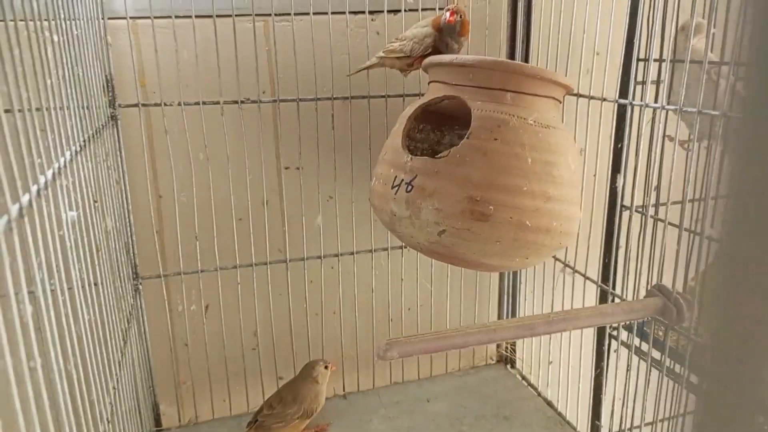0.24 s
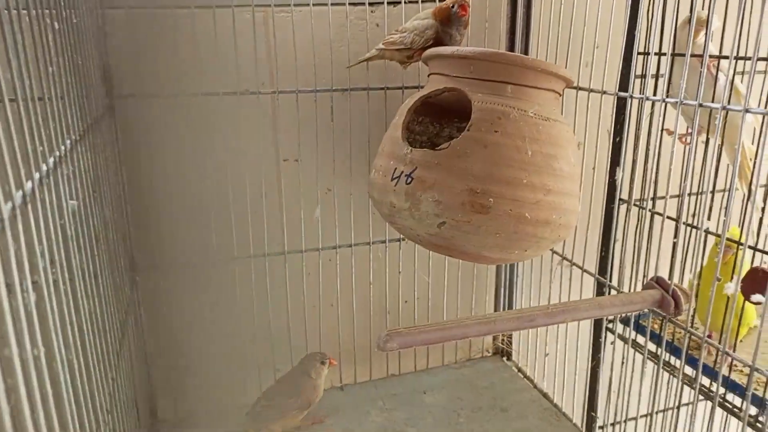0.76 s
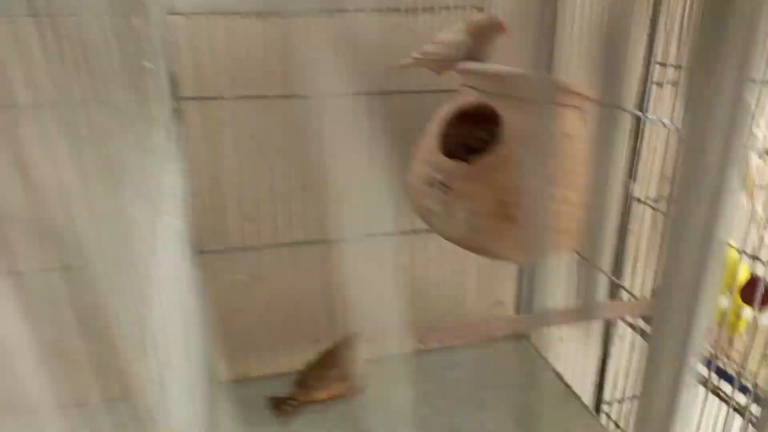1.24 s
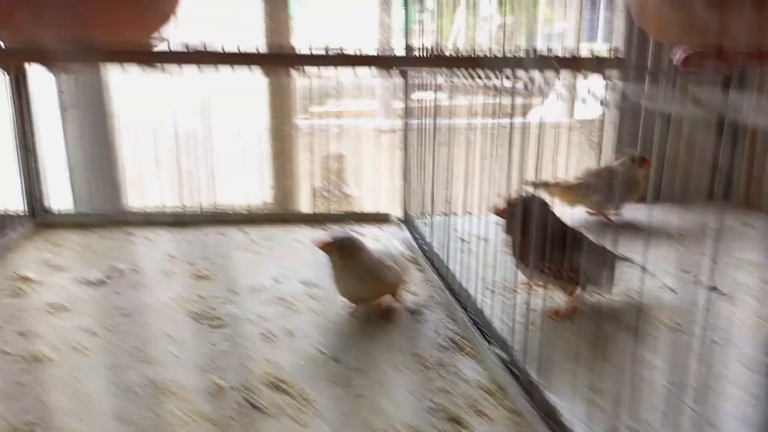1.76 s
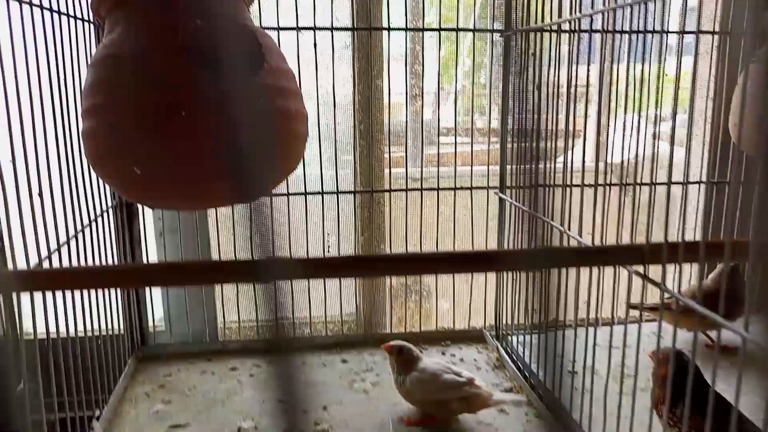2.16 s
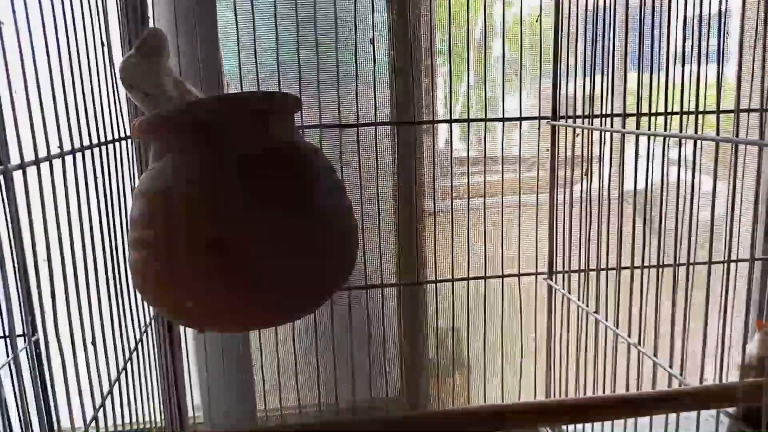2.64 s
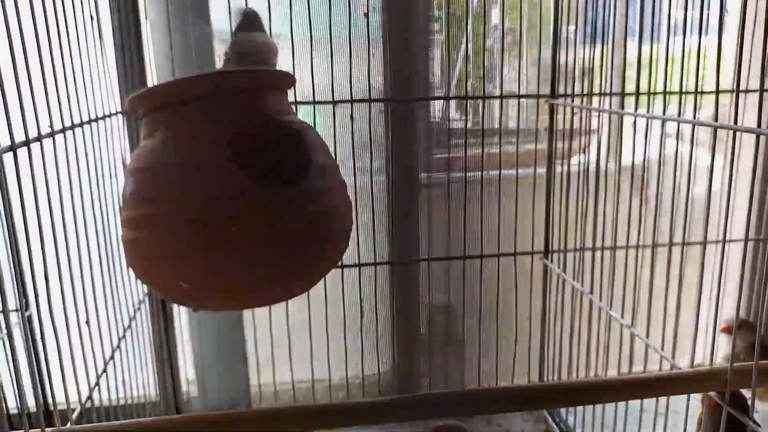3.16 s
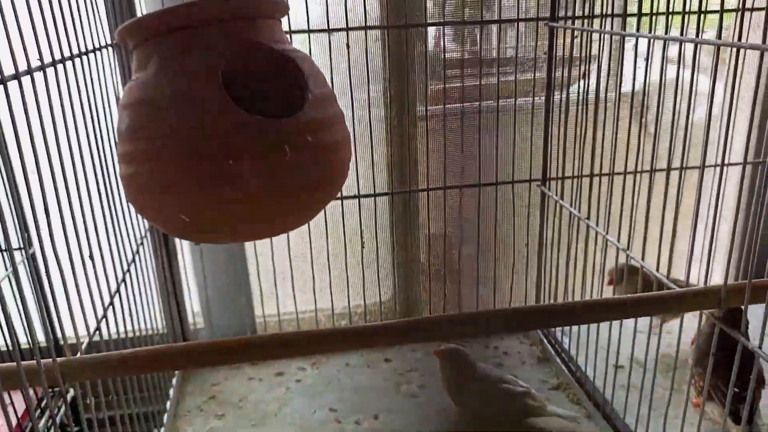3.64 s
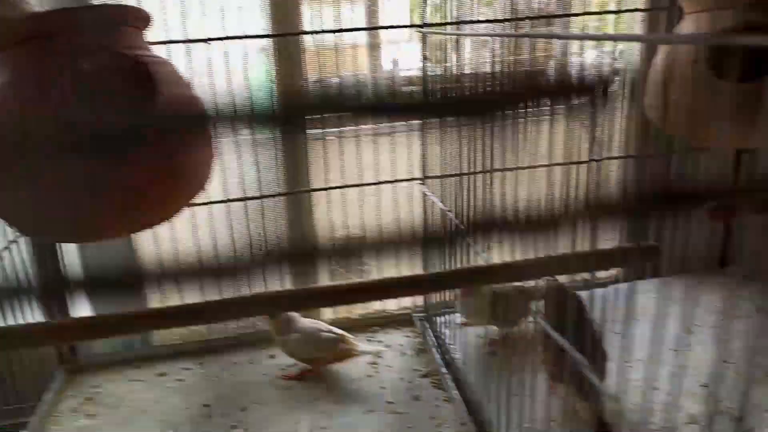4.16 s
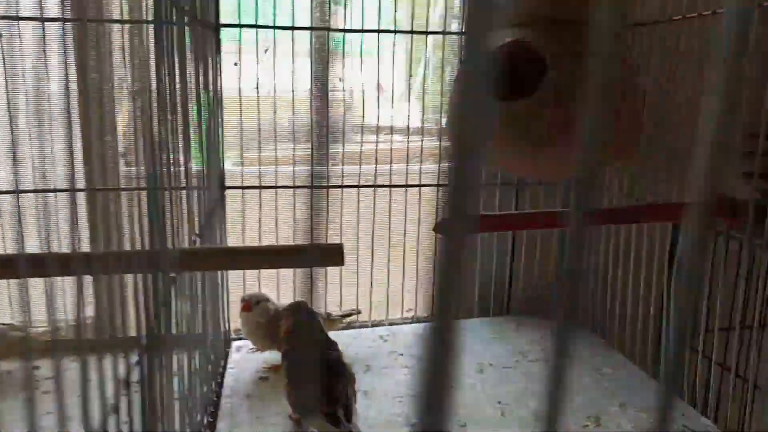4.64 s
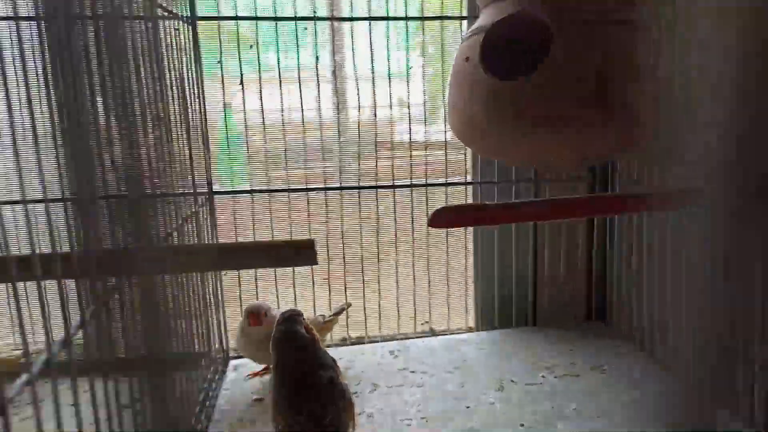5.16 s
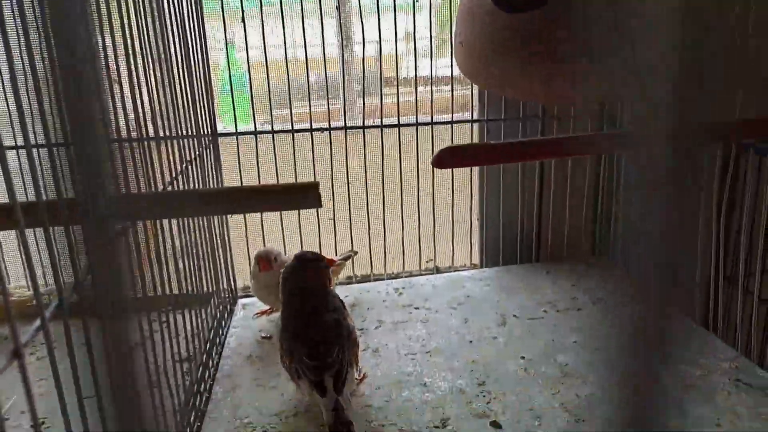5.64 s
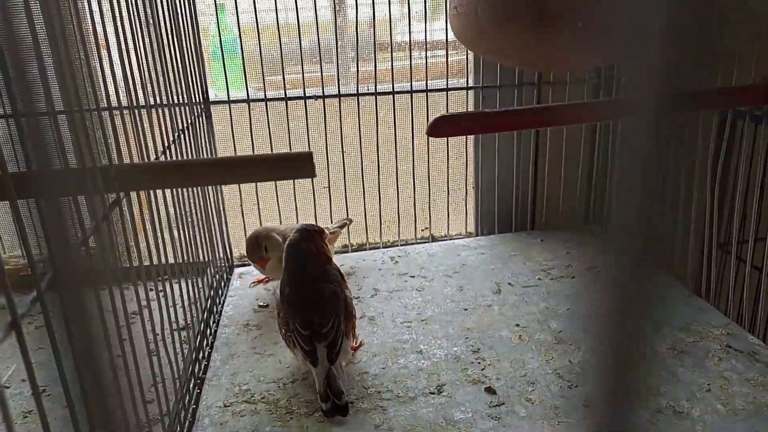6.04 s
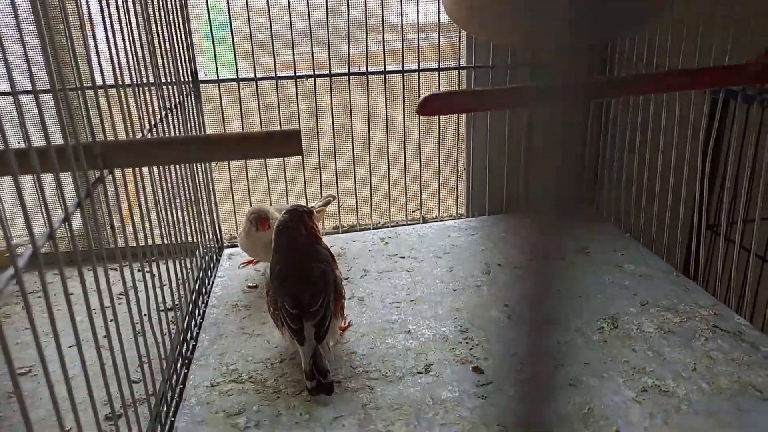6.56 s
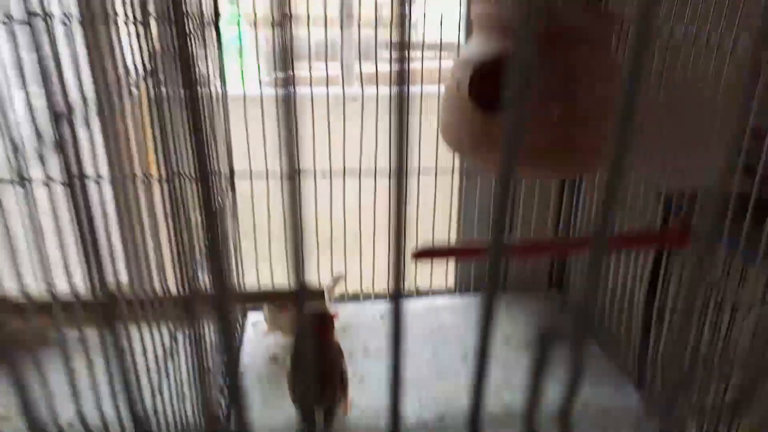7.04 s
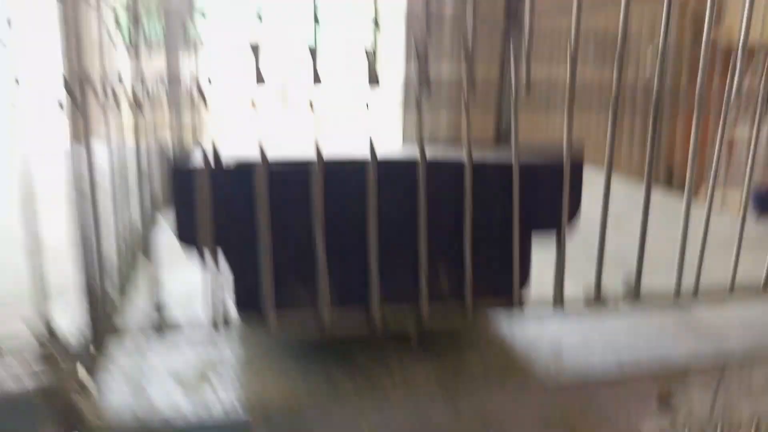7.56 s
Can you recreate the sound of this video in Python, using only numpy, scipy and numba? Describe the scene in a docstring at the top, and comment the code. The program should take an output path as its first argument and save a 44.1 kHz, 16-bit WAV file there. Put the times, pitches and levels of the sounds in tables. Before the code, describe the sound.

Close to the cages, finches open with hissy chips, two then a rapid cluster. After sparser calls and a quick knock, raspy chatter builds with short nasal notes and two strong chips, over other birds murmuring farther off. A soft low motor hum swells briefly as the microphone moves. The calls thin to quiet beeps, then a second run of rasps and a few nasal notes ends it in the small reverberant room.

```python
"""Two short sharp chips come first, then small finches give harsh rasps, nasal notes and more chips in a bare
aviary. Rasps are pulse trains and breath noise through moving resonances; notes and chips are overtone stacks
around a resonance, chips with a burst of hiss. A far flock murmurs, and knocks ring the cage modes. Feedback
delays make the hard room. A mains motor hums as a harmonic series; rumble, air and treble hiss are shaped noise."""
import sys
import numpy as np
from scipy import signal
from scipy.fft import rfft, irfft, next_fast_len
from scipy.io import wavfile
from scipy.ndimage import uniform_filter1d, minimum_filter1d
from numba import njit

SR = 44100
rng = np.random.default_rng(int(sys.argv[2]) if len(sys.argv) > 2 else 0)


def file_out(sig):
    """Save sig as 16-bit WAV at sys.argv[1]."""
    # one column per channel
    cols = np.atleast_2d(sig).T
    # limit, then scale
    lim = np.clip(cols, -1, 1)
    pcm = np.round(lim * 32767).astype(np.int16)
    wavfile.write(sys.argv[1], SR, pcm)


N = 343980

# the hum swells and fades as the microphone moves: (time [s], level [dB])
HUM_LEVEL = [(0, -68.5), (2.5, -65.5), (2.62, -50.5), (3.3, -58.5), (4.1, -70), (4.55, -43), (5.3, -53.5),
             (6.5, -57.5), (7.2, -61.5), (7.4, -61), (7.8, -65.5)]


def from_db(db):
    """Level to amplitude ratio: 20 dB for a factor of ten."""
    return 10 ** (np.asarray(db) / 20)


def rms_one(x):
    """Normalisation to unit effective value."""
    return x / np.sqrt(np.mean(x ** 2) + 1e-20)


def in_time(rows):
    """Linear interpolation of each column after the first, sample by sample."""
    s, *columns = np.transpose(rows)
    return [np.interp(np.arange(N) / SR, s, c) for c in columns]


def drift(rate_hz, count=N):
    """Slow random modulation: white noise through a double one-pole low-pass, run in; rms 1."""
    r = np.exp(-2 * np.pi * rate_hz / SR)
    noise = rng.standard_normal(count + 8000)
    return rms_one(signal.lfilter([1], [1, -2 * r, r * r], noise)[8000:])


def band(x, low_hz, high_hz):
    """Band-pass filtering with a maximally flat (Butterworth) response."""
    return signal.sosfilt(signal.butter(2, [low_hz, high_hz], "band", fs=SR, output="sos"), x)


def mains_hum():
    """Harmonic series of a mains motor: each partial wavers in level and phase."""
    # partials: (frequency [Hz], level against the hum level [dB])
    partials = [(60, -27), (120, 0), (180, -1.5), (240, -7), (300, -15.5), (360, -17), (420, -20.5)]
    t = np.arange(N) / SR
    hum = 0
    for hz, db in partials:
        wavering_phase = 2 * np.pi * hz * t + .5 * drift(5.1)
        hum = hum + from_db(db + 3.4 * drift(3.4)) * np.sin(wavering_phase)
    return from_db(in_time(HUM_LEVEL)[0]) * hum


def whine():
    """Pure tone with phase jitter: a 360 Hz overtone that stands out early, then stops."""
    # (time [s], amplitude level [dB])
    whine_level = [(0.0, -59.5), (1.68, -61.5), (2.3, -72)]
    t = np.arange(N) / SR
    sounding = t < whine_level[-1][0]
    tone = np.sin(2 * np.pi * 360 * t + .5 * drift(2.1))
    return from_db(in_time(whine_level)[0]) * sounding * tone


def rumble():
    """Band-limited noise whose level follows part of the hum's swing and bulges once."""
    base_db, follows = -61, 0.31   # level at a hum of -57.5 dB, outside the bulge; share of the hum's swing
    swell_s, swell_width_s, swell_db = 4.857, 0.17, 10.5
    t = np.arange(N) / SR
    swell = swell_db * np.exp(-((t - swell_s) / swell_width_s) ** 2)
    level_db = base_db + follows * (in_time(HUM_LEVEL)[0] + 57.5) + swell
    return from_db(level_db + 4.9 * drift(11)) * rms_one(band(rng.standard_normal(N), 62, 514))


def treble_hiss():
    """High band-limited noise under an amplitude envelope: the hiss comes and goes."""
    # (time [s], level [dB])
    treble_level = [(0, -43.5), (.7, -56), (2.2, -53), (2.55, -85.5), (4.55, -81), (4.95, -44.5),
                    (5.15, -54), (5.3, -82.5), (7.8, -87.5)]
    noise = band(band(rng.standard_normal(N), 5600, 8900), 4000, 12500)
    return from_db(in_time(treble_level)[0]) * rms_one(noise)


def air_noise():
    """Spectral shaping: white noise weighted by the colour of the air noise, slowly drifting in level."""
    # (time [s], level [dB])
    air_level = [(0, -56.5), (1.5, -51.5), (3, -50), (5, -52.5), (7.2, -50), (7.8, -54.5)]
    # relative spectrum: (frequency [Hz], density [dB per Hz])
    air_spectrum = [(15, -53), (25, -26.5), (64, -30.5), (118, -12.5), (366, -34.5), (504, -9.5),
                    (1530, 2.5), (2760, -1), (3360, 6), (4980, -16), (9000, -24.5), (11700, -71),
                    (19800, -120)]
    hz, db = np.transpose(air_spectrum)
    bins_hz = np.fft.rfftfreq(N, 1 / SR)
    colour = from_db(np.interp(np.log(bins_hz + 1), np.log(hz), db))
    noise = rms_one(irfft(rfft(rng.standard_normal(N)) * colour, N))
    return from_db(in_time(air_level)[0] + 0.89 * drift(0.93)) * noise


def stack(hz, centre_hz, spread_hz, hoarse):
    """Additive synthesis: overtones of hz fade away from a centre; hoarseness shakes pitch and level."""
    count = len(hz)
    shaken_hz = hz + 130 * hoarse * hz / centre_hz * drift(133.4, count=count)
    phase = 2 * np.pi * np.cumsum(shaken_hz) / SR
    k = np.arange(1, int(10000 / hz.max()) + 1)[:, None]
    fall_db = -6.0 * np.abs((k * hz - centre_hz) / spread_hz) ** 1.407
    fall_db -= 4.2 * np.clip(10 * (k * hz / centre_hz - 1), 0, 1)   # weaker above the centre
    tones = np.sum(from_db(fall_db) * np.sin(k * phase + k ** 2), axis=0)   # k squared scatters the phases
    return np.sqrt(2) * tones * from_db(4.58 * hoarse * drift(110, count=count))


def far_flock():
    """Superposition of many sources: random nasal notes from other cages over a murmur of band noise."""
    # (time [s], level of notes and of murmur before its own wavering [dB])
    far_level = [(0, -49), (2.5, -40.5), (3.3, -40.5), (4.43, -27.5), (5.1, -44.5), (5.8, -48), (6.5, -34),
                 (7.4, -31), (7.8, -49)]
    notes_per_s = 22
    out = np.zeros(N + SR)
    for when, length, pitch, colour, loud in rng.random((int(notes_per_s * N / SR), 5)):
        size = int((0.04 + .12 * length) * SR)
        hz = (520 + 200 * pitch) * np.linspace(1.01, .99, size)
        note = stack(hz, 2700 + 2500 * colour, 480, hoarse=.45)
        out[int(when * N):][:size] += note * np.hanning(size) ** .5 * from_db(-12 * loud)
    blur = rms_one(band(band(rng.standard_normal(N), 2400, 4600), 2200, 5000))
    murmur = from_db(-2.5 + 1.5 * drift(6)) * blur
    return from_db(in_time(far_level)[0]) * (rms_one(out[:N]) + murmur)


def knocks():
    """Modal excitation: each blow is a short scuff of noise that rings the cage modes, over a dull thud."""
    # blows on the cage: (time [s], scuff drive [dB], thud drive against it [dB])
    blow_rows = [(2.481, -17.5, -38), (2.513, -16, -22), (2.522, -16.5, -22), (3.467, -37, -17),
                 (3.913, -21.5, -12), (3.931, -31, -9.5), (3.954, -50, -9)]
    # modes: (frequency [Hz], drive gain [dB], 60 dB decay time [s])
    cage_modes = [(375, -37, 0.047), (480, -26.5, 0.066), (630, -29.5, 0.046), (811, -28.5, 0.022),
                  (1256, -36.5, 0.051)]
    blows = np.zeros((2, N))
    for s, scuff_db, thud_db in blow_rows:
        blows[:, round(s * SR)] = from_db([scuff_db, scuff_db + thud_db])
    decays = signal.lfilter([1], [1, -.992], blows)
    scuff, thud = decays * rng.standard_normal((2, N)) + 1e-18
    out = from_db(11.5) * band(scuff, 404, 900) + from_db(32) * band(band(thud, 81, 270), 80, 510)
    for hz, gain_db, t60 in cage_modes:
        r, w = from_db(-60 / (t60 * SR)), 2 * np.pi * hz / SR
        mode = [0, np.sin(w)], [1, -2 * r * np.cos(w), r * r]
        out += from_db(gain_db) * signal.lfilter(*mode, band(scuff, 450, 1600))
    return out


def chips():
    """Transient with a resonance: a hoarse stack, strongest at the beak, and broad hiss, dying fast."""
    # (time [s], level before halving [dB], fundamental after the drop [Hz], beak resonance [Hz],
    #  starting hiss gain against the tone [dB])
    chip_rows = [(.002, -23.5, 2810, 5530, -4.5), (0.03, -26, 1646, 6600, -3),
                 (0.311, -13, 1314, 6300, -3.5), (.335, -6.5, 1720, 6220, -6.5),
                 (0.362, -24.5, 1273, 4460, 14.5), (.392, -7, 2467, 5200, -2), (.431, -9, 2430, 5060, -2),
                 (0.502, -5.5, 2725, 5470, -8), (0.534, -19, 2754, 5100, 5.5), (0.73, -21, 999, 4480, 2.5),
                 (1.085, -9, 873, 5250, -2.5), (1.098, -15, 868, 4880, 4), (1.266, -19.5, 1727, 5560, -9.5),
                 (1.446, -15.5, 2490, 5470, -16), (1.517, -20, 2404, 4820, -16),
                 (1.539, -23.5, 1327, 4370, -17), (1.563, -6, 2900, 6220, -22),
                 (1.626, -11.5, 861, 5340, -21), (2.359, -7, 3160, 6240, -25), (3.922, -5, 654, 6560, -13),
                 (4.02, 3, 608, 6440, -23.5), (6.391, -19.5, 655, 5700, -26),
                 (6.797, -9.5, 637, 5430, -15.5)]
    dip, dip_s = 0.0904, 0.0081   # pitch starts this share high and drops
    hold_s, t60_s = 0.013, .075   # full level, then the tone's 60 dB decay
    shake_db = .3   # fast pitch tremor, 20 log10 of the frequency ratio
    out, t = np.zeros(N + SR), np.arange(SR // 5) / SR
    shape = np.minimum(t / 0.005, 1) * from_db(-60 * np.maximum(t - hold_s, 0) / t60_s)
    for s, level_db, hz, beak_hz, hiss_db in chip_rows:
        pitch_hz = hz * (1 + dip * np.exp(-t / dip_s)) * from_db(shake_db * drift(250, count=len(t)))
        tone = stack(pitch_hz, beak_hz, 1076, hoarse=0.83)
        hiss = rms_one(band(band(rng.standard_normal(len(t)), 2800, 8400), 2700, 9800))
        hiss *= from_db(-40 * t / t60_s)   # the hiss dies before the tone
        out[round(s * SR):][:len(t)] += from_db(level_db) * (tone + from_db(hiss_db) * hiss) * shape / 2
    return out[:N]


def notes():
    """Formant principle: gliding harmonics around a mouth resonance; clear notes carry more overtones."""
    # (start [s], loudest [s], end [s], level at the loudest [dB], overtone nearest the mouth resonance at
    #  full effort, first [Hz] and last [Hz], its number, hoarseness [0-1]);
    # a fraction in the number sets the resonance between two overtones
    note_rows = [ (0.356, 0.421, .5, -19.5, 3580, 3405, 0.98, .7),
                 (0.497, 0.57, .7, -19.5, 3380, 3122, 1, 0.5),
                 (0.437, 0.453, .64, -21.5, 2643, 2846, 4, 0.7),
                 (1.087, 1.103, 1.38, -42.5, 1535, 1514, 1, 0.71),
                 (1.442, 1.446, 1.67, -37, 2424, 2615, 1, 0.91),
                 (1.963, 2, 2.08, -36.5, 3310, 3310, 6, 0.25),
                 (2.048, 2.162, 2.22, -45, 1350, 1345, 2, 0.8),
                 (2.21, 2.235, 2.255, -9.5, 3125, 3173, 1, 0.34),
                 (2.261, 2.286, 2.43, -19.5, 2598, 2860, 3, 0.65),
                 (2.309, 2.333, 2.37, -18.5, 3250, 3450, 1, .8),
                 (2.384, 2.406, 2.5, -16, 3350, 3307, 1, 0.58),
                 (2.799, 2.816, 2.95, -36, 2790, 2646, 5, 0.26),
                 (3.28, 3.305, 3.33, -37, 4440, 4460, 8, .25),
                 (3.345, 3.372, 3.39, -41.5, 1820, 1810, 3, 0.24),
                 (3.657, 3.73, 3.82, -20.5, 3640, 3680, 6, 0.71),
                 (3.836, 3.933, 3.93, -17, 3685, 3670, 6, 0.65),
                 (3.99, 3.998, 4.06, -41, 2280, 2290, 1, .3), (4.18, 4.256, 4.28, -19, 3037, 3036, 1, 0.73),
                 (4.455, 4.541, 4.66, -15, 3785, 3186, 6, 0.77),
                 (4.702, 4.754, 4.83, -17, 5450, 5700, 5, 0.61),
                 (4.749, 4.79, 4.94, -33, 2067, 1820, 3, 0.94),
                 (5.014, 5.046, 5.3, -44, 1523, 1535, 2, .83),
                 (5.36, 5.396, 5.64, -32, 5400, 5340, 7.68, 0.32),
                 (5.432, 5.468, 5.65, -20, 3830, 3820, 5.45, 0.63),
                 (5.963, 5.971, 6.06, -40.5, 2280, 2340, 2, 0.55),
                 (6.112, 6.228, 6.45, -24, 4676, 4494, 4.02, 0.13),
                 (6.207, 6.25, 6.37, -29.5, 3530, 3400, 6, 0.28),
                 (7.267, 7.294, 7.335, -10, 4018, 4104, 5.17, 0.35),
                 (7.325, 7.337, 7.44, -25.5, 5630, 4870, 4, .7),
                 (7.423, 7.457, 7.49, -24, 4360, 4270, 8, 0.18),
                 (7.487, 7.557, 7.7, -13, 3056, 3440, 5, 0.78),
                 (7.476, 7.619, 7.7, -16.5, 3876, 3863, 6, 0.78), ]
    rise_db, fall_db = 8, 12.5   # below the loudest at start and end
    pitch_per_db = .0015   # pitch rises with effort, share per dB
    spread_clear, spread_hoarse = 0.6, 0.34   # reach of the side overtones, in fundamentals
    out = np.zeros(N)
    for start, loudest, end, level_db, first_hz, last_hz, number, hoarse in note_rows:
        a, b = round(start * SR), round(end * SR)
        under_db = np.interp(np.arange(a, b) / SR, [start, loudest, end], [rise_db, 0, fall_db])
        overtone_hz = np.linspace(first_hz, last_hz, b - a) * (1 - pitch_per_db * under_db)
        hz = overtone_hz / round(number)
        spread_hz = hz * (spread_clear + (spread_hoarse - spread_clear) * hoarse)
        edges = signal.windows.tukey(b - a, min(1, 0.017 * SR / (b - a)))
        voice = stack(hz, hz * number, spread_hz, hoarse)
        out[a:b] += voice * edges * from_db(level_db - under_db)
    return out


def syrinx(hz):
    """Pulse source: one pulse a cycle, placed between samples, its mean flow removed; rms 1."""
    cycles = np.cumsum(hz) / SR
    steps = np.floor(cycles) + np.clip((cycles % 1) * SR / hz, 0, 1)
    return rms_one(np.diff(steps, prepend=0) - hz / SR)


@njit
def moving_resonance(x, hz, r, sr):
    """Two-pole resonance whose centre follows hz; the pole radius r sets its damping."""
    y = np.zeros(len(x))
    for i in range(2, len(x)):
        drive = (1 - r * r) / 2 * (x[i] - x[i - 2])
        y[i] = drive + 2 * r * np.cos(2 * np.pi * hz[i] / sr) * y[i - 1] - r * r * y[i - 2]
    return y


def cavity(x, hz, width_hz):
    """Cavity resonance, applied twice for steep flanks; rms 1."""
    r = np.exp(-np.pi * width_hz / SR)
    return rms_one(moving_resonance(moving_resonance(x, hz, r, SR), hz, r, SR))


def rasps():
    """Source and filter: two unsteady syrinx halves and breath noise, shaped by throat and beak cavities."""
    # (start [s], loudest [s], end [s], throat gain [dB], throat centre at mid-call [Hz],
    #  beak gain [dB], open beak centre at mid-call [Hz]); effort and wavering act on top
    rasp_rows = [ (0.153, .19, .25, -39.5, 3130, -43, 4550), (.305, .4, .62, -51, 3300, -23, 6850),
                 (1.318, 1.37, 1.43, -38, 3250, -47, 4500), (1.507, 1.6, 1.76, -37, 3440, -27.5, 5300),
                 (2.103, 2.187, 2.23, -28, 3900, -32, 5080), (2.247, 2.376, 2.53, -22.5, 3370, -20, 5880),
                 (2.63, 2.668, 2.75, -25, 3530, -32, 4340), (3.39, 3.42, 3.48, -18.5, 3730, -19, 6200),
                 (3.482, 3.552, 3.635, -13, 3440, -9, 5800), (3.64, 3.711, 3.81, -14, 3660, -12, 5940),
                 (3.822, 3.904, 3.94, -16, 3600, -13.5, 5500), (3.909, 3.948, 4.01, -22, 4130, -7.5, 6760),
                 (4.023, 4.064, 4.23, -19.5, 3920, -5, 6150), (4.263, 4.329, 4.41, -14, 3600, -9.5, 5820),
                 (4.421, 4.55, 4.68, -15.5, 3780, -20.5, 5180), (4.697, 4.84, 4.96, -15.5, 4110, -10, 5700),
                 (5.028, 5.203, 5.27, -39, 2950, -35, 6080), (5.433, 5.457, 5.78, -25.5, 3620, -33.5, 4540),
                 (5.862, 5.894, 6.05, -42.5, 3410, -67, 4600), (6.371, 6.405, 6.53, -22, 3170, -23, 5700),
                 (6.549, 6.665, 6.75, -14.5, 3170, -16.5, 4960),
                 (6.756, 6.811, 6.84, -16.5, 3830, -13, 5940), (6.818, 6.887, 6.97, -11, 3440, -14, 5430),
                 (6.953, 7.025, 7.07, -21.5, 3870, -45, 5150), (7.057, 7.15, 7.24, -21, 3400, -16.5, 5710),
                 (7.317, 7.334, 7.5, -17.5, 3940, -29.5, 4870), (7.488, 7.566, 7.73, -26, 3200, -42, 4930),
                 ]
    pitch_hz, throat_width_hz, beak_width_hz = 603.8, 1000, 1400
    throat_sag, beak_sag = 600, 1800   # Hz per s: both cavities sink as the breath runs out
    # a weak low resonance that sinks with effort; its level is against the throat
    chest_hz, chest_hz_per_db, chest_width_hz, chest_db = 1964, 46, 880, -15
    calls, spill = np.zeros(N), np.zeros(N)
    for start, loudest, end, throat_db, throat_hz, beak_db, beak_hz in rasp_rows:
        a, size = round(start * SR), round((end - start) * SR)
        n = np.arange(size)
        rise = (loudest - start) * SR   # samples up to the loudest moment
        left, right = [syrinx(pitch_hz * side * from_db(.21 * drift(90, count=size))) for side in (1, 1.04)]
        source = left + right + .75 * rng.standard_normal(size)
        source = source * from_db(1.5 * drift(120, count=size))
        effort_db = np.interp((a + n) / SR, [start, start + 0.017, loudest, end - .03, end],
                              [-2.5, -8.5, -2.5, -17.0, -21.5])
        past = (n - size / 2) / SR   # seconds past the middle

        # the voice breaks: each cavity swells and shifts on its own
        throat_gain_db = throat_db + 2.2 * drift(35, count=size)
        beak_gain_db = beak_db + 2.2 * drift(35, count=size)
        throat_centre = (throat_hz - throat_sag * past) * from_db(0.31 * drift(17, count=size))
        throat = cavity(source, throat_centre, throat_width_hz)
        throat -= from_db(chest_db) * cavity(source, chest_hz - chest_hz_per_db * effort_db, chest_width_hz)
        opening = 1 - 0.1 * np.exp(-n / (0.16 * rise))   # the beak resonance climbs as it opens
        beak_centre = opening * (beak_hz - beak_sag * past) * from_db(0.56 * drift(14, count=size))
        beak = cavity(source, beak_centre, beak_width_hz)

        onset = np.minimum(n / (0.22 * rise), 1)   # the breath builds from nothing
        voice = from_db(throat_gain_db) * throat - from_db(beak_gain_db) * beak
        calls[a:a + size] += onset * from_db(effort_db) * voice
        spill[a:a + size] += onset * from_db(1.7 * effort_db + beak_gain_db) * source
    # the windpipe passes little outside this band; some high hiss spills past
    windpipe = np.vstack([signal.butter(4, 1250, "high", fs=SR, output="sos"),
                          signal.butter(12, 7300, fs=SR, output="sos")])
    hiss = from_db(-34.5) * band(spill, 8200, 11600) + from_db(-44.5) * band(spill, 13800, 16000)
    return signal.sosfilt(windpipe, calls) + hiss


def aviary(x):
    """Reverberation by ten feedback delays: walls absorb more treble, so each round comes back duller."""
    low_t60_s, wall_cut_hz = 0.2, 30000   # decay time in the bass; frequency that would halve it
    size = next_fast_len(N + SR)
    hz = np.fft.rfftfreq(size, 1 / SR)
    t60 = low_t60_s / (1 + (hz / wall_cut_hz) ** 2)
    combs = 0
    for k, lag in enumerate(rng.uniform(.008, .03, 10)):
        back = from_db(-60 * lag / t60) * np.exp(-2j * np.pi * hz * lag)
        combs = combs + (-1) ** k * back / (1 - back)
    return irfft(rfft(x, size) * combs, size)[:N]


def scene():
    """Superposition of direct sound, reverberation and the dry surroundings."""
    birds = notes() + chips() + knocks() + rasps() + far_flock()
    room_db = -13.5   # gain of the summed delays
    surroundings = mains_hum() + whine() + rumble() + treble_hiss() + air_noise()
    return (birds + from_db(room_db) * aviary(birds) + surroundings)[None]


def record(dry):
    """Port resonance lifts 15 kHz at the microphone; a look-ahead limiter holds peaks; a low-pass cuts the top."""
    port = dry + from_db(24) * band(band(dry, 14200, 16000), 14200, 16000)
    allowed = minimum_filter1d(1 / np.maximum(np.abs(port), 1), size=265)
    limited = port * uniform_filter1d(allowed, size=133)
    top_cut = signal.cheby2(16, 90, 16300, fs=SR, output="sos")   # 90 dB down from 16.3 kHz up
    return signal.sosfilt(top_cut, limited)


dry = scene()
out = record(dry)
file_out(out)
```